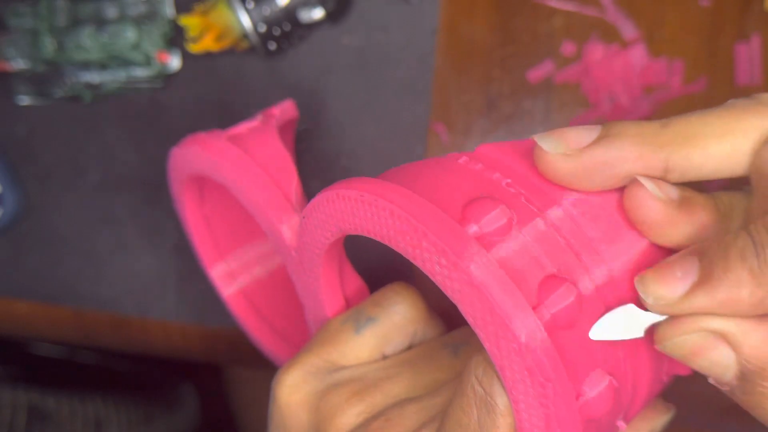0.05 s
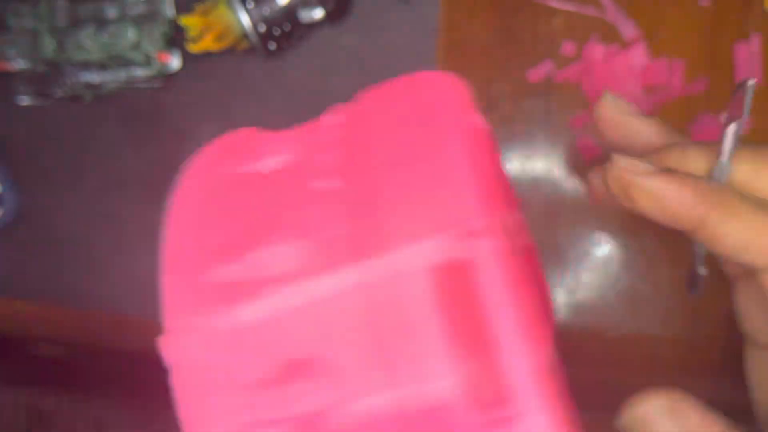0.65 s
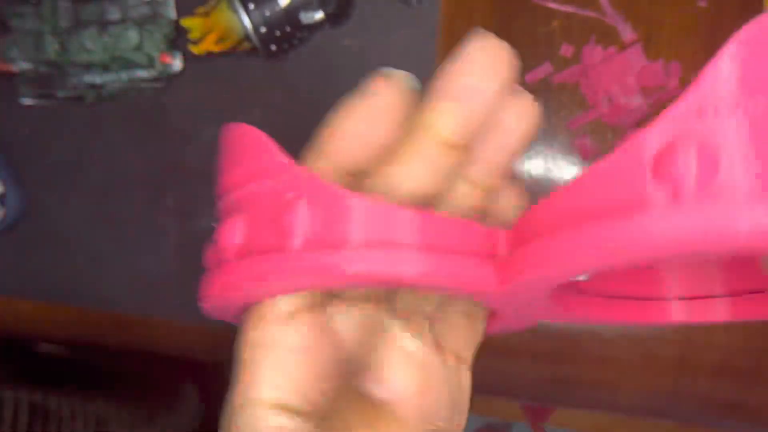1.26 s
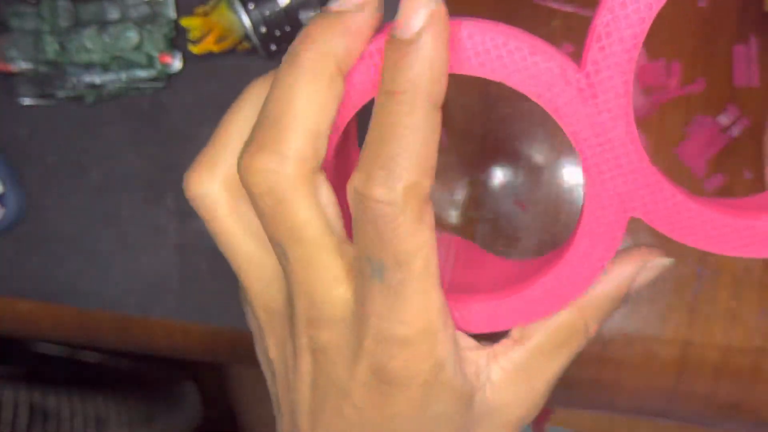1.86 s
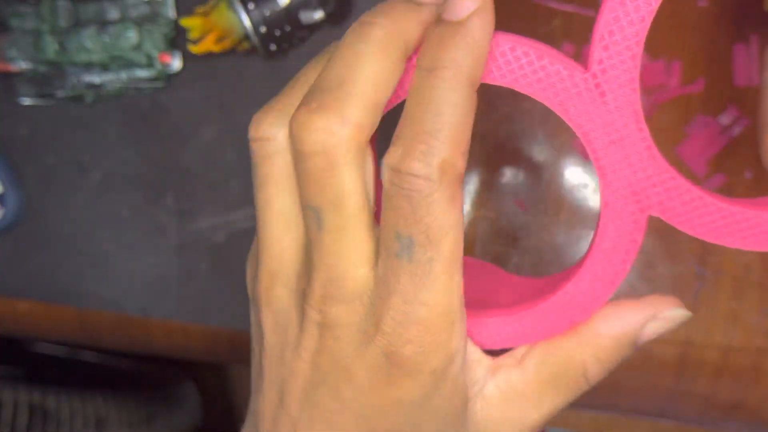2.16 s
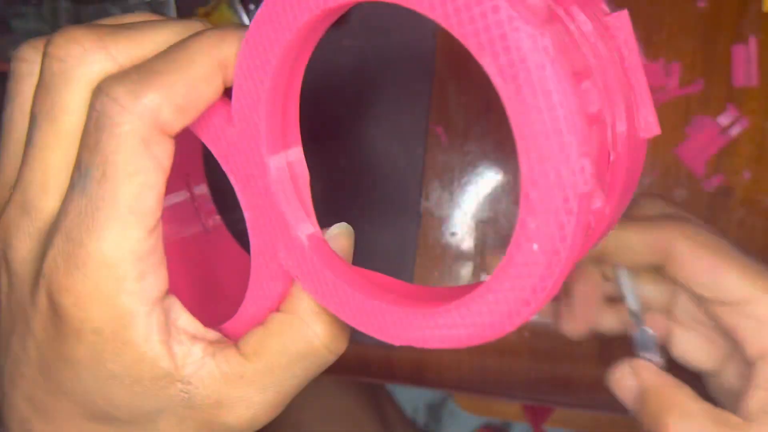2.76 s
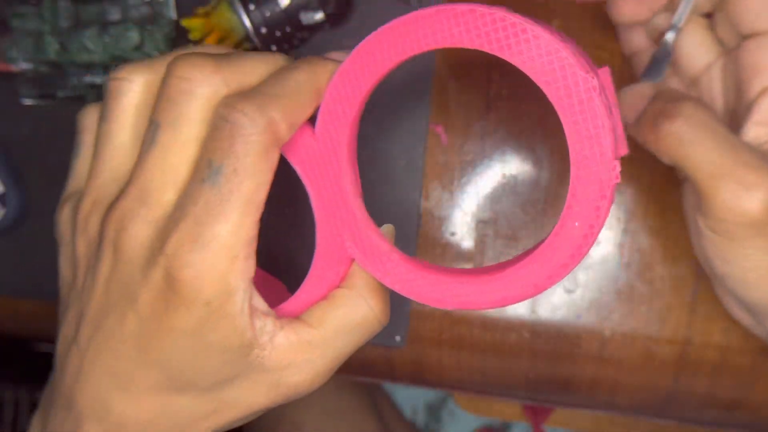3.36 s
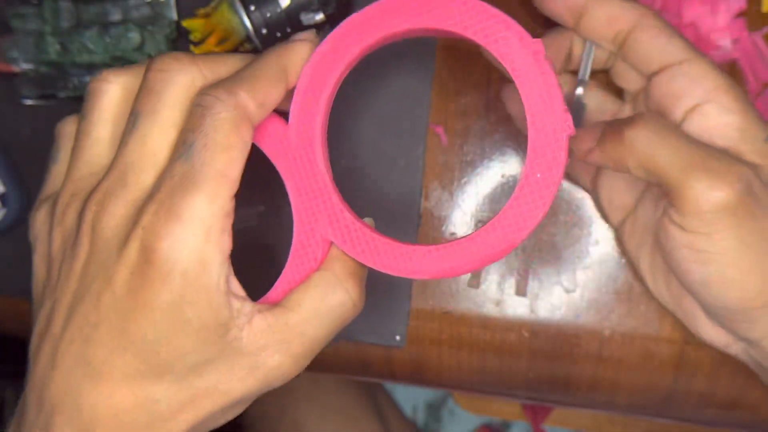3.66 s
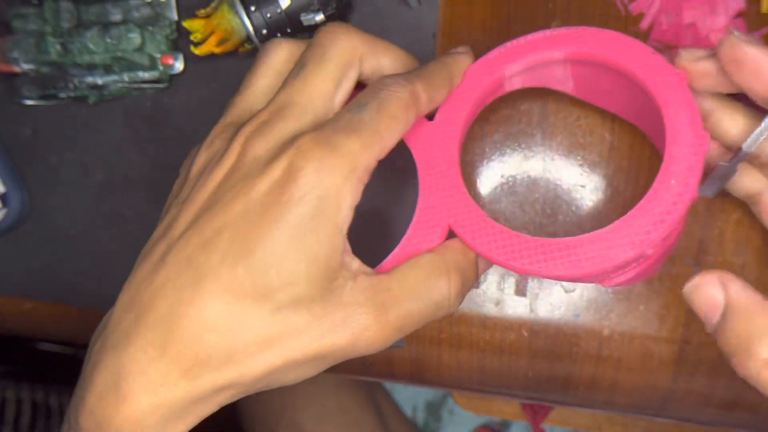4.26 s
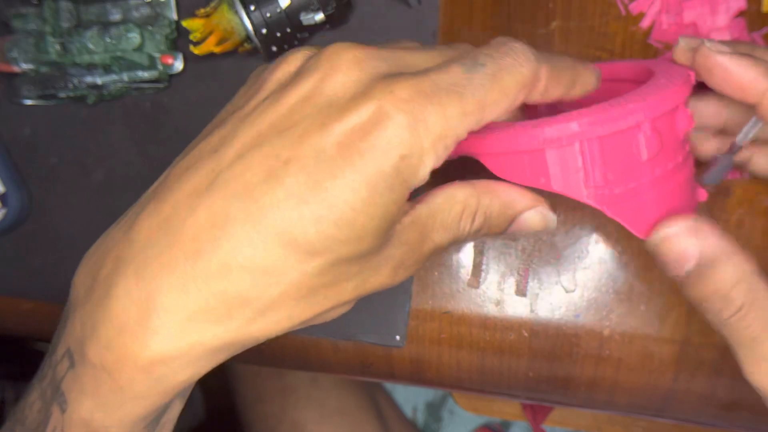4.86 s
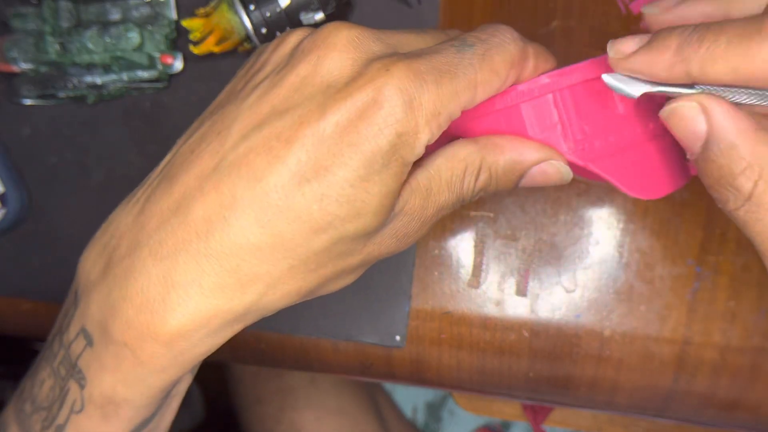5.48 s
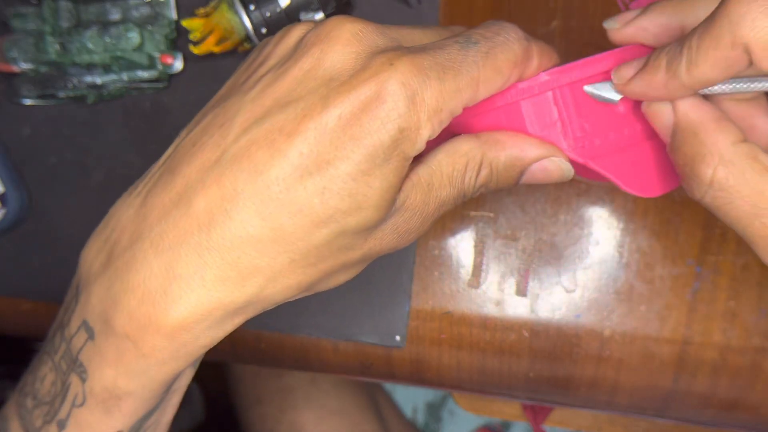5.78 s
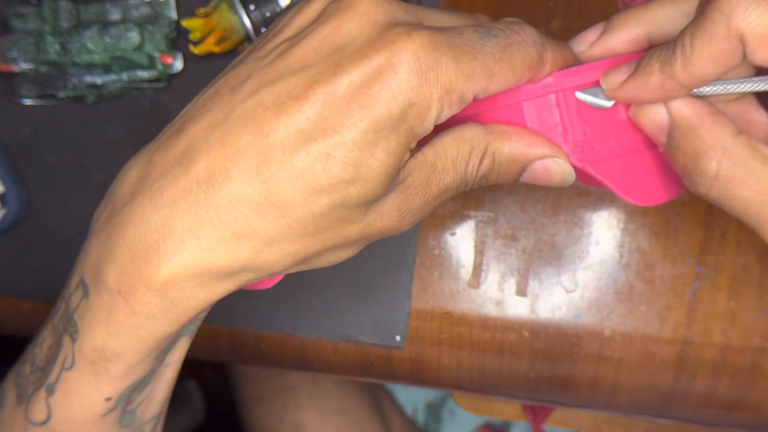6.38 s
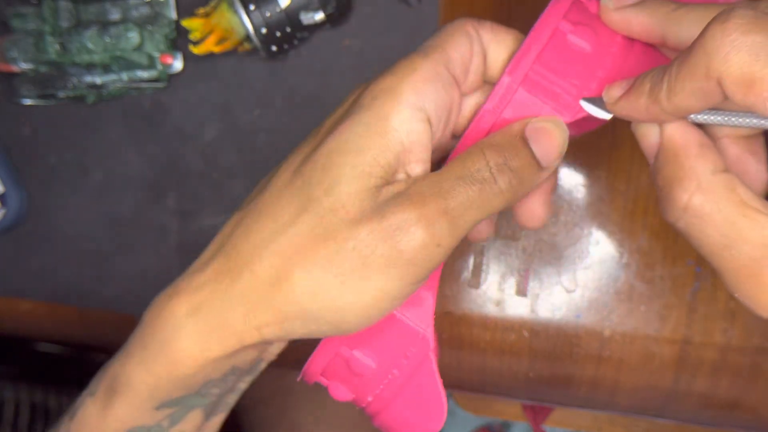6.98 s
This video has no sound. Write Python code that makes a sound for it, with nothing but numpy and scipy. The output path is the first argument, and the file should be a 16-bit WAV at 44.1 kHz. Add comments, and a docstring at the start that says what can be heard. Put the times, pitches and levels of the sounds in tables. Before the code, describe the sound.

A steady low motor and electrical hum with a faint rush of air fills a small room throughout. Close to the microphone, a small steel blade gives a short scrape and a sharp snap on a hollow plastic part right at the start. Faint ticks and rustles of a shifting grip follow from about 1 to 2.5 seconds, with a crisp click at 2 seconds. Around 3.2 seconds a finger rubs and swishes across the ridged plastic, and a few snaps and a scrape come at 3.5. More picking begins near 4.4 seconds, and the part hits the wooden desk with a dull thump at 4.7, the strongest knock. Scattered small scrapes, clicks and soft bumps continue. From about 6.4 seconds to the end at 7, quick scratches, briefly ringing snaps and low desk knocks crowd together.

```python
"""A small steel blade picks and scrapes support scraps off a hollow printed plastic part.
Close up, on a phone's stereo microphone above a wooden desk: the edge chatters over the layer
ridges, scraps snap, and both set the shell ringing. Fingers rub, rustle and slide on the part,
and it bumps the desk as it is braced there. All round, a small room with motor and mains hum."""
import sys
import numpy as np
from scipy import signal
from scipy.fft import rfft, irfft
from scipy.io import wavfile
from scipy.ndimage import uniform_filter1d

SR = 44100
rng = np.random.default_rng(int(sys.argv[2]) if len(sys.argv) > 2 else 0)


def bounce(signal):
    """Save signal as a 16-bit WAV file at the path given by the first command-line argument."""
    frames = np.transpose(np.atleast_2d(signal))
    limited = np.clip(frames, -1, 1)
    pcm = np.round(limited * 32767).astype(np.int16)
    wavfile.write(sys.argv[1], SR, pcm)


N = 318843
TIME = np.arange(N) / SR


def undb(db):
    """Decibels to gain."""
    return 10 ** (np.asarray(db) / 20)


def unit(x):
    """Scale to rms 1."""
    return x / np.sqrt(np.mean(x ** 2) + 1e-20)


def seconds(length):
    """Time axis of a short sound."""
    return np.arange(int(length * SR)) / SR


def add(out, s, sound):
    """Mix a stereo sound in, starting at s seconds."""
    start = int(s * SR)
    sound = sound[:, max(-start, 0):N - start]
    out[:, max(start, 0):max(start, 0) + sound.shape[1]] += sound


def pan(x, pan_db):
    """Make the left channel pan_db louder than the right."""
    return x * undb(np.array([[pan_db], [-pan_db]]) / 2)


def colour(x, points):
    """Filter x by a curve of (f/Hz, level/dB) points, to rms 1."""
    hz, db = np.transpose(points)
    f = np.fft.rfftfreq(N, 1 / SR) + 1
    gain = undb(np.interp(np.log(f), np.log(hz), db))
    return unit(irfft(rfft(x) * gain, N))


def wander(rate):
    """Smooth random drift with a spread near 1, rate new values a second."""
    hold = int(SR / rate)
    steps = np.repeat(rng.standard_normal(N // hold + 1), hold)
    return 1.3 * uniform_filter1d(uniform_filter1d(steps, hold), hold)[:N]


def slips(force, per_s, spread_db):
    """Stick and slip: random tiny jerks of unequal size that follow the force."""
    slipping = rng.random(len(force)) < per_s / SR
    size = rng.standard_normal(len(force))
    return force * slipping * np.sign(size) * undb(spread_db * np.minimum(abs(size), 2))


def grains(per_s, spread_db):
    """An even stream of tiny slips, different at each microphone port."""
    return np.array([slips(np.ones(N), per_s, spread_db) for _ in range(2)])


def resonance(jerks, hz, cycles, port_phase):
    """A gliding ring, 60 dB down after that many cycles; the ports hear it port_phase radians apart."""
    turn = np.exp(2j * np.pi * np.cumsum(hz * np.ones(len(jerks))) / SR)
    decay = np.exp(-np.log(1000) * seconds(.06) * np.mean(hz) / cycles)
    ring = turn * signal.fftconvolve(jerks / turn, decay)[:len(jerks)]
    ports = np.exp(1j * port_phase * np.arange(2))[:, None]
    return unit((ring * ports).imag)


# Motor and mains tones in the room, a little right: f/Hz, rms level/dB
HUM_TONES = [(57.53, -47.4), (52.43, -64.5), (69.5, -69), (119.95, -62.3), (240, -78), (398.4, -71.5)]
# Spectra of the low rumble and of the air all round the microphone: f/Hz, relative level/dB
RUMBLE_SPECTRUM = [(20, -39.5), (42, 7.5), (58, 23), (72, 15), (92, 7.5), (125, 11.5), (160, 9.5),
                   (220, -47)]
AIR_SPECTRUM = [(88, -52), (150, -8), (221, -4.5), (267, -21), (371, -7.5), (401, -5.5), (535, -14),
                (578, -5), (818, -13.5), (883, -9.5), (1500, -15.5), (2050, -22), (2700, -32), (4540, -35),
                (15000, -57)]


def room_tone():
    """Steady motor and mains tones over a low rumble and the diffuse rush of moving air."""
    tones = 0
    for hz, db in HUM_TONES:
        amplitude = np.sqrt(2) * undb(db + 0.32 * wander(3.1))
        tones += amplitude * np.sin(2 * np.pi * (hz * TIME + rng.random()))
    rumble = undb(-58) * colour(rng.standard_normal(N), RUMBLE_SPECTRUM)
    # long waves reach both ports alike
    shared = colour(rng.standard_normal(N), [(150, -11), (300, 3), (600, -49.5), (2000, -63)])
    air = colour(rng.standard_normal((2, N)) + 0.11 * shared, AIR_SPECTRUM)
    air *= undb(-60.88 + .5 * wander(9.9))
    return pan(tones + rumble, pan_db=-1.9) + air


# Modes of the plastic shell: f/Hz, undamped t60/s, level struck at the rim/dB, level on the wall/dB
SHELL_MODES = [(588, 0.15, -31.5, -1.5), (851, 0.092, -34, 7.5), (1113, 0.062, -0.5, -15.5),
               (1208, 0.031, -3.5, -9), (1570, 0.13, -27, -2), (1864, 0.16, -4, -19.5),
               (1991, .07, 5.5, -10), (2383, 0.043, -6.5, -6), (2710, 0.038, -4.5, -16.5),
               (3554, 0.045, -12.5, 3.5), (3973, .035, -3, 3), (5070, .03, 5, -9.5),
               (5484, 0.043, 5.5, -12), (6190, 0.034, -13.5, 10), (6935, 0.046, -2, -2.5),
               (11600, .06, -6.5, 8), (12460, .04, -9.5, 8)]
CROWDED_HZ, CROWD_COUNT, CROWD_SPREAD = 3200, 4, .035  # treble modes come in close crowds
BLADE_DAMPING_HZ = 6240  # the resting blade halves a rim ring's length at this pitch


def shell_ring(place, t):
    """The hollow shell rings at both ports; the place touched (0 rim, 1 wall) weights its modes."""
    copies = np.where(np.array(SHELL_MODES)[:, 0] > CROWDED_HZ, CROWD_COUNT, 1)
    hz, t60, rim_db, wall_db = np.repeat(SHELL_MODES, copies, axis=0).T[:, :, None]
    crowd = np.repeat(copies, copies)[:, None]
    detune = .004 + 0.014 * place + CROWD_SPREAD * (crowd > 1)  # the grip detunes the wall
    hz = hz * (1 + detune * rng.standard_normal(hz.shape))
    damping = 1 + 3.1 * place + (hz / BLADE_DAMPING_HZ) ** 2  # fingers and blade
    decay = np.exp(-np.log(1000) * t * damping / t60)
    phase = rng.uniform(0, 2 * np.pi, hz.shape)
    port_shift = np.array([0.91, -0.91])[:, None, None] * rng.choice([-1, 1], hz.shape)
    weights = undb(rim_db + place * (wall_db - rim_db)) / np.sqrt(crowd)
    return (weights * decay * np.sin(2 * np.pi * hz * t + phase + port_shift)).sum(1)


def edge_noise(jerks, spot_hz, spot_db, cycles, crack_db):
    """Sound straight from the contact: a dry crack for each jerk and the ring of the touched spot."""
    t = seconds(.01)
    crack = rng.standard_normal((2, len(t))) * np.exp(-t / 0.0002)
    cracks = unit(signal.fftconvolve(jerks[None], crack, axes=1)[:, :len(jerks)])
    spot = resonance(jerks, spot_hz, cycles, port_phase=1.5)
    return undb(crack_db) * cracks + undb(spot_db) * spot


# Body, knock, treble and air bands of a contact: low f/Hz, high f/Hz
CONTACT_BANDS = [(400, 1400), (1400, 3200), (3200, 8500), (8500, 14400)]


def weight_bands(sound, span, treble_db, body_db, knock_db, air_db):
    """Grip and edge sharpness set each band's rms over span; body, knock, air are relative to treble."""
    out = 0
    for edges, relative_db in zip(CONTACT_BANDS, (body_db, knock_db, 0, air_db)):
        band = signal.sosfilt(signal.butter(3, edges, "bandpass", fs=SR, output="sos"), sound)
        rms = np.sqrt(np.mean(band[:, span] ** 2) + 1e-20)
        out += band * undb(treble_db + relative_db) / rms
    return out


# Blade or fingernail strokes, close to the microphone: peak t/s, rise/s, treble level/dB, body/dB,
# knock/dB, place (0 rim, 1 wall), touched spot f/Hz, spot level/dB
BLADE_STROKES = [(.014, 0.014, -52, -1, 1.5, 0.35, 3520, -10), (1.775, 0.084, -74, -10, 4, 0.15, 2000, -9),
                 (1.908, 0.063, -67, -13, -2, 0.33, 5400, 1),
                 (2.67, 0.15, -89.5, 2.5, 16.5, 0.44, 2200, -11.5),
                 (3.545, 0.029, -56.5, 2, 0.5, 0.28, 5250, -1), (4.39, 0.038, -84.5, 21, 20.5, 0, 1830, -8),
                 (4.462, 0.023, -73, 10, 10.5, 0.45, 1950, -9),
                 (4.515, 0.012, -60.5, 6.5, 13, 0.15, 2500, -11), (4.751, .012, -52, 2.5, 4, 0.39, 2770, 2),
                 (4.972, 0.032, -59.5, 4, 7, 0.48, 3400, -0.5),
                 (5.095, 0.029, -72, 10.5, 9, 0.45, 2820, -21),
                 (5.843, 0.014, -58, 6.5, 4.5, 0.69, 4200, -8),
                 (6.07, .021, -71, 3.5, 2.5, 0.64, 2970, -14),
                 (6.385, .028, -64.5, 12, 5.5, 0.81, 2700, -16),
                 (6.49, 0.035, -64.5, 8.5, 7.5, 0.73, 2580, -2),
                 (6.527, .012, -51.5, 1.5, 4.5, 0.59, 2600, -1), (6.558, .026, -55, 5.5, 4, 0.45, 2420, 7),
                 (6.667, 0.011, -46.5, 1.5, 4, .5, 2480, -6), (6.708, 0.024, -58.5, -5, 8.5, 0.24, 3700, 1),
                 (6.757, 0.023, -51.5, 1.5, 4.5, 0.9, 2520, -1.5),
                 (6.889, 0.015, -66.5, 15, 6, 0.76, 1248, -19), (6.929, .012, -74, 17.5, 6, 0.34, 1270, -6),
                 (7.032, 0.023, -76, 10, 6, 0.55, 1240, -13)]
MEDIUM_STROKE_DB, FALL_PER_RISE, CATCH_DB = -61, 1.23, 1.8
PRESSURE_OCTAVES, RIDGE_OCTAVES = .2, .06  # pressure raises the spot's pitch, each ridge shifts it


def blade_strokes():
    """The edge catches and chatters over the layer ridges as the pressure swells and lets go."""
    out = np.zeros((2, N))
    catches = wander(170)
    for s, rise, db, body_db, knock_db, place, spot_hz, spot_db in BLADE_STROKES:
        fall = FALL_PER_RISE * rise
        t = seconds(2 * rise + 3 * fall) - 2 * rise
        pressure = np.exp(-(t / np.where(t < 0, rise, fall)) ** 2)
        catch = np.interp(s + t, TIME, catches)
        force = pressure * undb(CATCH_DB * catch)
        moving_hz = spot_hz * 2 ** (PRESSURE_OCTAVES * (pressure - 1) + RIDGE_OCTAVES * catch)
        chatter = slips(force, per_s=560, spread_db=2.5)
        ring = shell_ring(place, seconds(0.11))
        shell = unit(signal.fftconvolve(chatter[None], ring, axes=1)[:, :len(t)])
        # pressed harder, the blade rasps more and hisses less
        crack_db = 1.5 + .25 * (db - MEDIUM_STROKE_DB)
        air_db = -15 - 0.32 * (db - MEDIUM_STROKE_DB)
        # the moving edge chokes the spot's ring
        edge = edge_noise(chatter, moving_hz, spot_db, cycles=6, crack_db=crack_db)
        loudest = slice(int(1.5 * rise * SR), int((2 * rise + fall / 2) * SR))
        add(out, s - 2 * rise, weight_bands(shell + edge, loudest, db, body_db, knock_db, air_db))
    return out


# Snaps and taps on the part, close up: t/s, treble level/dB, body/dB, knock/dB, air/dB, contact/ms,
# place (0 rim, 1 wall), touched spot f/Hz, spot level/dB, left minus right/dB
SNAPS = [(0.0305, -39.5, -7.5, -2.5, -2.5, 0.51, 1, 3590, -11, 2.5),
         (0.1722, -56, 15.5, 11.5, -18, 8.3, 0.86, 572, -4.5, 2),
         (.783, -63, -19, -7, -25, 1.9, 0.48, 5300, -2, 1),
         (1.048, -76.5, 1, 11, -14, 4, 0.19, 1600, 1, -2), (1.156, -68.5, 9, 1, -14, 5, 0.19, 1160, 5, 0),
         (1.3558, -71.5, -9, 8, -17, 6.7, 0.35, 2370, 0, 1),
         (1.426, -68.5, -13, 3.5, -12, 9.3, 0.34, 5500, -9, 2),
         (1.7216, -58.5, -2, 1.5, -14, 7.5, 0.47, 5000, -18, 1.5),
         (1.87, -57, 9, 11, -12, 5.6, 0.34, 2090, -1, 3.5),
         (1.9741, -32.5, -20, -8.5, -9, 3.3, 0.24, 5520, -5.5, 0.5),
         (2.776, -71.5, -9, -3.5, -12, 5, 0.56, 7080, -4.5, -0.5),
         (3.1973, -60.5, -12, -10, -10, 2.8, .7, 7400, 3, -5),
         (3.4962, -49, -0.5, -3.5, -16, 8, 0.64, 650, -6.5, 0),
         (3.512, -44.5, -0.5, 1.5, -20, 7, 0.22, 5190, -5, -1),
         (3.59, -57, 3.5, 1.5, -16, 2.1, 0.18, 5200, -1, 2.5),
         (3.821, -65.5, -7, -3.5, -23, 2.7, 0.93, 4000, 0, -3.5),
         (4.307, -77.5, 14.5, 12.5, -13, 5.1, 0, 1970, 0, 1.5),
         (4.434, -73.5, 0, 1, -24, 4, 0, 5450, 3, -7), (4.525, -45, 8, 10, -17, 5.2, 0.23, 2700, -7, 3.5),
         (4.555, -68, 16, 22.5, -16, 16, 0.039, 1840, 3, 6.5),
         (4.691, -58.5, 19.5, 18, -19, 2.05, 0.51, 2055, 3, 0.5),
         (4.7408, -50, -12, 0.5, -15.5, 23, 0.48, 4350, -4, 1.5),
         (5.217, -76, 15.5, -3, -3.5, 2.8, 0.77, 8000, 2, 0.5),
         (5.7035, -52.5, 11.5, 3, -9.5, 2.5, 0.63, 1026, -10, 1),
         (5.825, -56, 0, -7, -9, 11, 0.45, 4340, -4, 2.5),
         (5.85, -62, 15.5, 7.5, -10, 5.6, 0.69, 806, -7, 4),
         (6.558, -61.5, 10.5, -1, -9, 2.3, 0.18, 1245, 5, -2),
         (6.586, -67, 3, 11, -8, 3, 0.65, 1230, 2.5, 5), (6.6684, -37, 1, -4, -14.5, 4, 0.74, 1270, 1.5, 2),
         (6.678, -50.5, 3, 4.5, -23, 4.6, 0.58, 5900, -15, 6),
         (6.7415, -58, 4, 4, -16, 4.3, 0.34, 3540, 2, 5), (6.763, -57, 10, 5, -7, 5.1, 0.073, 1170, -8, 0),
         (6.774, -44.5, 2, -10, -9, 13, 0.59, 4970, -7.5, 3.5),
         (6.877, -71, 20.5, 13, -8, 4.7, 0.65, 1150, -18, 2),
         (6.924, -69.5, 17.5, 15, -20, 2.1, 0.35, 1240, -16, 0),
         (7.006, -71, 0, 3, -23, 2.7, 0.88, 3730, 0, 7),
         (7.022, -75.5, 21.5, 4, -20, 4.6, 0.66, 814, -2, 6),
         (7.046, -56, -10, -3.5, -19, 7.8, 0.7, 4250, -7, 4.5)]


def scrap_snaps():
    """A scrap gives way in a burst of fractures; the shell gathers their energy and rings on."""
    out, t = np.zeros((2, N)), seconds(.14)
    attack = slice(0, SR // 50)
    for s, db, body_db, knock_db, air_db, contact_ms, place, spot_hz, spot_db, pan_db in SNAPS:
        progress = t / (contact_ms / 1000)
        force = np.sqrt(progress) * np.exp(-progress ** 2)  # the crack runs, then dies out
        shell = unit(shell_ring(place, t) * (1 - np.exp(-3 * progress)))
        fractures = slips(force, per_s=5800, spread_db=2)
        edge = edge_noise(fractures, spot_hz, spot_db, cycles=48, crack_db=-6.5)
        snap = weight_bands(shell + edge, attack, db, body_db, knock_db, air_db)
        add(out, s, pan(snap, pan_db))
    return out


# Fingertips moving round the part, near centre: t/s, level/dB
RUB_LEVELS = [(.24, -105), (.35, -81), (.42, -93), (.48, -80.5), (.58, -105), (2.91, -110), (2.93, -73),
              (3.17, -67.5), (3.22, -57), (3.41, -71), (3.47, -94.5), (3.73, -82), (3.83, -65),
              (4.08, -100)]
# Spectrum of the rub: f/Hz, relative level/dB
RUB_SPECTRUM = [(500, -16), (1500, 5.5), (3000, 3.5), (5500, -1.5), (8000, -2.5), (10000, -11.5),
                (13000, -2), (14300, -10), (15200, -34)]


def fingertip_rub():
    """Fingertips pass lightly over the fine ridges with an airy rub."""
    s, db = np.transpose(RUB_LEVELS)
    gain = undb(np.interp(TIME, s, db, left=-120, right=-120) + 1.5 * wander(130))
    ridges = colour(grains(per_s=6900, spread_db=6), RUB_SPECTRUM)
    return pan(gain * ridges, pan_db=1)


# Shifts of grip, close to the microphone: centre t/s, half length/s, level/dB
GRIP_SHIFTS = [(1.075, .025, -69), (1.199, 0.044, -68.5), (1.336, 0.04, -68.5), (1.4, 0.011, -80),
               (2.254, 0.07, -78.5), (2.364, 0.032, -82), (2.465, 0.019, -66.5)]
# Spectrum of the ticks: f/Hz, relative level/dB
RUSTLE_SPECTRUM = [(500, -11.5), (1200, 4.5), (2300, 4), (3200, -4), (5400, 0.5), (8000, -8.5),
                   (10000, -15), (13500, -12), (15000, -35)]


def grip_rustles():
    """Skin and nails let go of the ridges in scattered dry ticks as the grip shifts."""
    gain = sum(undb(db) * np.exp(-((TIME - s) / half) ** 2) for s, half, db in GRIP_SHIFTS)
    return gain * colour(grains(per_s=260, spread_db=4.5), RUSTLE_SPECTRUM)


# One finger drawn across the part, close and a little right: t/s, gain/dB, swish f/Hz
SLIDE_PATH = [(3.19, -95, 8500), (3.203, -54, 9000), (3.235, -50, 9400), (3.27, -53.5, 8800),
              (3.315, -60, 8300), (3.36, -63, 7700), (3.395, -60, 7000), (3.44, -100, 6800)]
# Spectrum of its hiss: f/Hz, relative level/dB
SLIDE_SPECTRUM = [(2500, -40), (4500, -12), (5600, -6), (7000, -3), (8100, 3), (10500, 0), (11200, -8.5),
                  (14200, -11.5), (15200, -45)]


def finger_slide():
    """A pressed finger swishes across the ridges, sinking in pitch and fading as it slows."""
    s, db, hz = np.transpose(SLIDE_PATH)
    gain = undb(np.interp(TIME, s, db, left=-120, right=-120) + 1.5 * wander(130))
    ridges = colour(grains(per_s=4000, spread_db=9), SLIDE_SPECTRUM)
    swish = resonance(ridges[0], np.interp(TIME, s, hz), cycles=11, port_phase=1.7)
    return pan(gain * (undb(-5) * swish + undb(-3.5) * ridges), pan_db=-2)


# Part and hands bumping the desk below the microphone: t/s, peak level/dB, push/ms
DESK_BUMPS = [(4.458, -37, 9.9), (4.6927, -30.5, 0.44), (4.6994, -16, 2.42), (4.7083, -22.5, 3.4),
              (4.7197, -34.5, 2.1), (5.001, -35, 5.6), (5.094, -39, 4), (5.704, -40.5, 2.6),
              (5.823, -37.5, 5.6), (5.849, -38.5, 1.86), (6.384, -37, 2.7), (6.401, -31.5, 2.94),
              (6.516, -38, 4.5), (6.574, -31.5, 4.7), (6.606, -31.5, 5.1), (6.673, -31.5, 2.2),
              (6.688, -26.5, 4.94), (6.764, -39, 3.4), (6.8834, -24, 4.9), (6.919, -32.5, 4.5),
              (7.026, -36.5, 2.9)]
# Modes of the wooden top: f/Hz, t60 after a light bump/s, relative level/dB
DESK_MODES = [(110, 0.082, -47), (140.2, 0.21, -3), (212, 0.14, -2.5), (228, 0.15, -2), (259, 0.093, 4.5),
              (319.6, 0.1, 3), (324, 0.12, -1.5), (369.3, 0.26, -3), (400, 0.18, -15), (551, 0.066, 8),
              (720, 0.015, -24)]
LIGHT_BUMP_DB, RING_HALVING_DB = -31, 45


def desk_bumps():
    """A soft push sets the desk ringing; a longer push sounds duller, a firm hand shortens the ring."""
    out, t = np.zeros((2, N)), seconds(.25)
    hz, t60, mode_db = np.transpose(DESK_MODES)[:, :, None]
    radiation = signal.butter(2, 70, "highpass", fs=SR, output="sos")  # slow flexing makes no sound
    port_lag_s = np.array([0, .00018])[:, None, None]
    for s, db, push_ms in list(DESK_BUMPS) + nudges():
        ring_share = 2 ** ((LIGHT_BUMP_DB - db) / RING_HALVING_DB)
        decay = np.exp(-np.log(1000) * t / (t60 * ring_share))
        weights = undb(mode_db + 2 * rng.standard_normal(hz.shape))  # each spot favours other modes
        ring = (weights * decay * np.cos(2 * np.pi * hz * (t - port_lag_s))).sum(1)
        push_s = push_ms / 1000
        push = np.sin(np.pi * seconds(push_s) / push_s) ** 2
        thud = signal.sosfilt(radiation, signal.fftconvolve(-push[None], ring, axes=1))
        add(out, s, thud * undb(db) / abs(thud).max())
    return out


# Spells with the part braced on the desk: start t/s, end t/s
BRACED_SPELLS = [(4.779, 5.1), (6.06, 6.25), (6.5, 7.12)]


def nudges(gap_s=0.082, db=-44, push_ms=4):
    """The braced part nudges the desk faintly and unevenly; rows of t/s, peak level/dB, push/ms."""
    times = np.concatenate([np.arange(start, end, gap_s) for start, end in BRACED_SPELLS])
    scatter = rng.uniform(-0.88, 1, (len(times), 2))
    return [(s + gap_s * late / 2, db + 3 * firm, push_ms) for s, (late, firm) in zip(times, scatter)]


# Decay of the small room, heard from the desk: f/Hz, t60/s
ROOM_DECAY = [(150, 0.31), (600, 0.21), (2000, 0.26), (5500, 0.27), (12000, 0.2)]


def room(x, wet_db, echo_db):
    """An early echo off the desk and nearby things, then the short tail of a small room."""
    t = seconds(.5)
    f, frame_s, spectra = signal.stft(rng.standard_normal((2, len(t))), SR, nperseg=256)
    hz, t60 = np.transpose(ROOM_DECAY)
    bin_t60 = np.interp(np.log(f + 1), np.log(hz), t60)[:, None]
    decay = np.exp(-np.log(1000) * frame_s / bin_t60)
    onset = np.clip((t - .004) / 0.0027, 0, 1)
    tail = signal.istft(spectra * decay)[1][:, :len(t)] * onset
    response = undb(wet_db) * unit(tail) / np.sqrt(len(t))
    response[0, int(.0042 * SR)] += undb(echo_db)
    response[1, int(.0047 * SR)] += undb(echo_db)
    return x + signal.fftconvolve(x, response, axes=1)[:, :N]


def scene():
    """Handwork close to the microphone, the desk below it, the humming room all round."""
    work = scrap_snaps() + blade_strokes() + fingertip_rub() + finger_slide() + grip_rustles()
    work = room(work, wet_db=-6.5, echo_db=-7)
    desk = room(desk_bumps(), wet_db=-8, echo_db=-14.5)
    return work + desk + room_tone()


def record(dry, top_hz=15600):
    """The phone above the desk cuts the top treble steeply."""
    return signal.sosfilt(signal.ellip(8, .2, 70, top_hz, fs=SR, output="sos"), dry)


dry = scene()
out = record(dry)
bounce(out)
```